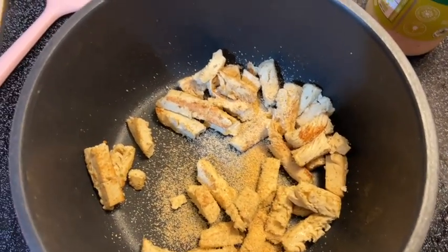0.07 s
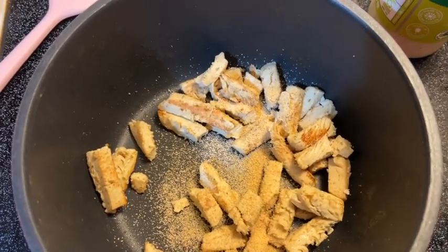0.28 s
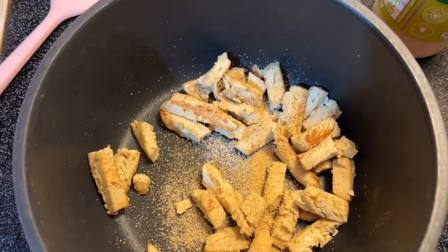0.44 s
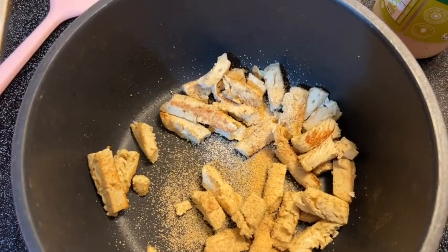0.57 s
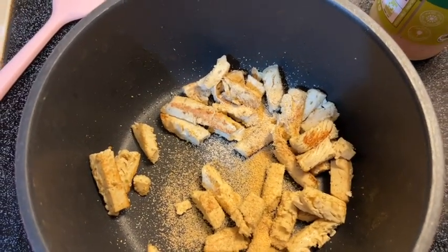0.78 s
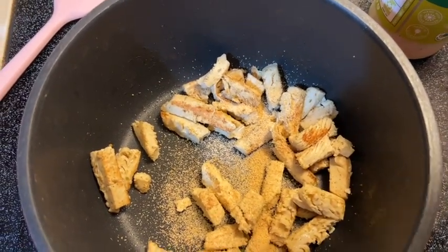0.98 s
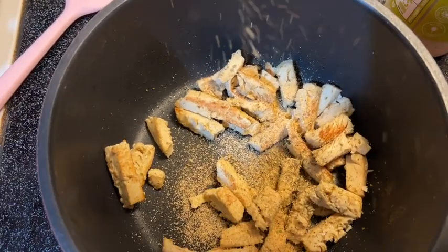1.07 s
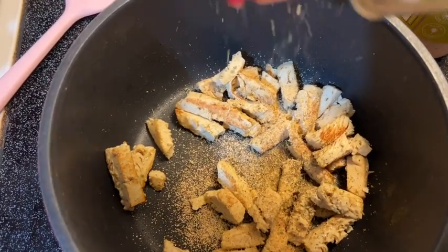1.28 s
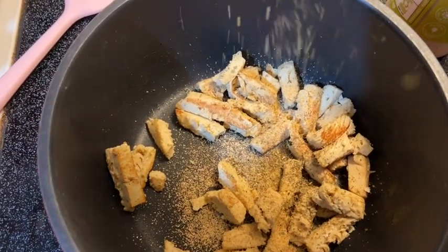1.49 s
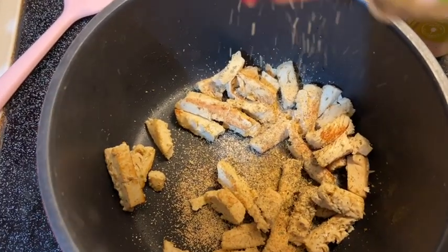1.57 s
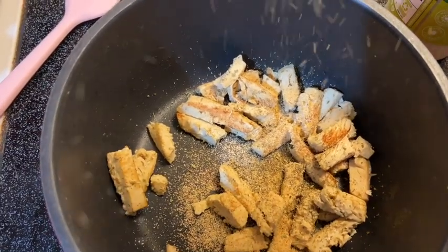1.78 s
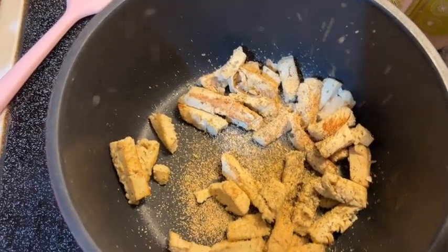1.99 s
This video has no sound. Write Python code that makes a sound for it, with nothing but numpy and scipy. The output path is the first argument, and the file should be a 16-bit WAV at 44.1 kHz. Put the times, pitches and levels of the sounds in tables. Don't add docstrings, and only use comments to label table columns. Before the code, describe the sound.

A spice jar thumps and rattles, its lid snaps, then dry grains pour hissing into a pan

```python
import sys
import numpy as np
from scipy import signal
from scipy.fft import rfft, irfft, next_fast_len
from scipy.io import wavfile
from scipy.ndimage import uniform_filter1d, map_coordinates

SR = 44100
rng = np.random.default_rng(int(sys.argv[2]) if len(sys.argv) > 2 else 0)


def to_linear_factor(level_db):
    exponent = np.asarray(level_db, float) / 20
    return 10 ** exponent


def output_pcm(signal):
    pcm = np.clip(np.atleast_2d(signal).T, -1, 1) * 32767
    wavfile.write(sys.argv[1], SR, np.round(pcm).astype(np.int16))


N = 90404

# [f/Hz, level/dB, t60/s]
JAR_MODES = [(127.2, -13, 0.09), (191, -13, 0.057), (259.8, 2, 0.086), (290.2, -5.5, .08),
             (350.3, -13.5, 0.13), (420.9, -5, 0.08), (560, -4.5, 0.046), (565, -9, 0.035),
             (663.2, -21, 0.11), (394.5, -1, 0.057), (483.8, -7.5, .04)]
# [f/Hz, width/Hz, level/dB]
CLATTER_BANDS = [(1250, 440, -6), (1470, 300, 4.5), (2050, 400, -3.5), (2990, 1300, -15), (5800, 830, -7)]
# [f/Hz, left minus right level/dB]
SLAM_SIDE = [(60, -12.5), (180, 7), (550, -4), (1650, -10), (4970, -10.5), (15000, 2.5)]
# [t/s, level/dB, f/Hz, t60/s]
THUDS = [(.201, -19.5, 385, 0.04), (0.243, -25, 332, 0.045), (0.263, -42, 294, 0.054),
         (.312, -39.5, 867, 0.034), (.317, -22.5, 264, 0.059), (.319, -29.5, 560, 0.055),
         (.341, -18, 309, 0.026), (.342, -28, 523, 0.033), (0.357, -36, 163, 0.057),
         (0.364, -28.5, 187.4, 0.072), (0.386, -44, 142, 0.1), (0.493, -43.5, 370, 0.06),
         (.546, -37.5, 560, 0.097), (0.555, -37.5, 458, 0.049), (.562, -29.5, 232, 0.047),
         (0.57, -45, 111, .1), (.674, -46.5, 654, 0.071), (.675, -49.5, 850, 0.036),
         (.686, -37.5, 224, 0.063), (0.7435, -26.5, 756, 0.023), (.744, -33.5, 546, 0.029),
         (1.129, -59, 330, 0.045), (1.46, -59, 621, 0.078), (1.2, -50, 313, 0.041), (1.2, -55, 745, .06),
         (1.99, -64.5, 489, 0.21), (2.04, -41.5, 760, 0.033), (2.046, -40.5, 1506, 0.027)]
# [t/s, level/dB, f/Hz, t60/s]
CAP_CLICKS = [(0.125, -37.5, 3400, 0.01), (0.125, -46, 6380, 0.016), (0.313, -42, 5630, 0.017),
              (0.312, -35, 1880, 0.013), (.324, -19, 4010, 0.0055), (.324, -38, 5800, 0.0086),
              (.324, -39, 10300, .008), (.324, -42, 14800, .008), (0.466, -44, 8180, 0.034),
              (.472, -33.5, 11100, 0.013), (.5545, -38.5, 1836, 0.015), (0.673, -51.5, 2210, 0.018),
              (.706, -44, 4000, .01), (1.107, -62, 526, 0.15), (1.463, -31, 3033, 0.008),
              (1.463, -39.5, 5900, .008)]
# [t/s, level/dB, f/Hz]
LARGE_GRAINS = [(.126, -47, 3500), (.3245, -30, 4000), (.3855, -31, 4500), (.408, -40, 5500),
                (.464, -41, 6500), (.473, -36, 4000), (.493, -34, 6500), (.4985, -35, 8500),
                (.518, -29, 12500), (.709, -40, 7500), (.8265, -41, 7000), (.976, -47, 11000),
                (1.007, -33, 6500), (1.0095, -33, 6500), (1.108, -36, 7500), (1.1345, -31, 6500),
                (1.173, -33, 12000), (1.191, -33, 11500), (1.196, -37, 8000), (1.204, -33, 5000),
                (1.2277, -23, 7000), (1.345, -31, 7000), (1.448, -25, 7500), (1.462, -29, 4000),
                (1.47, -36, 5000), (1.4995, -31, 7500), (1.5025, -34, 6000), (1.609, -32, 6500),
                (1.773, -30, 6500), (1.779, -33, 4000), (1.788, -33, 5000), (1.855, -30, 5500),
                (1.875, -32, 12000), (1.94, -36, 11000), (2.008, -35, 11000)]
# [t/s, level/dB, f/Hz, t60/s]
SCUFFS = [(.125, -55.5, 2000, 0.027), (.311, -47.5, 1640, 0.12), (.338, -51.5, 1480, .07),
          (.326, -52, 3600, 0.073), (.408, -47.5, 5320, .03), (.544, -57.5, 1720, 0.17),
          (.674, -57, 1510, 0.056), (1.41, -56, 1900, .05), (1.46, -50.5, 1900, 0.042),
          (1.78, -57.5, 1700, .04)]
# [t/s, length/s, level/dB, treble level/dB]
SHAKES = [
    (0.384, 0.02, -52.5, -2.5),
    (0.461, .02, -55, 0.5),
    (0.489, 0.037, -49, 2),
    (0.704, 0.062, -47.5, -0.5),
    (1.001, 0.02, -47.5, 5),
    (1.02, 0.036, -48, -9),
    (1.198, 0.05, -48, -16),
    (1.25, 0.052, -52, -8.5),
]
# [f/Hz, level/dB per Hz]
RATTLE_COLOUR = [(150, -27.5), (500, -4), (900, -6.5), (1200, -15.5), (1600, -4), (3500, -4.5),
                 (8000, -4.5), (16500, -13)]
# [t/s, level/dB]
POUR_LEVEL = [(0, -56.5), (.04, -63.5), (.2, -64), (.4, -60.5), (.55, -62.5), (0.699, -61), (.85, -63),
              (1.0, -63.5), (1.067, -56.5), (1.108, -40.5), (1.298, -44), (1.6, -43.5), (2.05, -44)]
# [f/Hz, level/dB per Hz]
HISS_COLOUR = [(1250, -56), (1900, -29.5), (2700, -17), (3400, -11.5), (4600, -15), (5800, -7.5),
               (10500, -3), (16500, -7.5)]
# [f/Hz, width/Hz, level/dB]
PAN_RING = [(7850, 130, 6), (3400, 500, -3), (5320, 300, -2.5)]
# [t/s, level/dB]
HUM_LEVEL = [(0, -100), (.12, -78), (.6, -74.5), (.8, -82), (.97, -76), (1.2, -78), (1.319, -71.5),
             (1.43, -76.5), (1.5, -66), (1.58, -67.5), (1.69, -85), (1.8, -70.5), (2.05, -75.5)]
# [f/Hz, level/dB per Hz]
RUMBLE_COLOUR = [(20, 0.5), (60, -2.5), (110, -8), (300, -12), (800, -15), (1100, -35), (1500, -12.5),
                 (3000, -92)]
# [t/s, level/dB]
RUMBLE_LEVEL = [(0, -14.5), (.2, 4), (.5, -1), (.8, -11.5), (1.0, -4), (1.3, 1), (1.6, 0.5), (1.8, -1),
                (2.05, 4)]
# [f/Hz, t60/s]
KITCHEN_T60 = [(100, 0.32), (1000, 0.33), (4000, .22), (12000, .12)]
# [f/Hz, gap/rad]
PORT_GAP = [(4100, .02), (4500, 1.3), (5500, 1.2), (5900, .02), (7600, .04), (8100, 1.0), (11600, 2.0),
            (12400, np.pi)]
# [t/s, length/s]
SHARED_TREBLE = [(.2, .015), (.31, .03), (.46, .02), (.487, .045), (.70, .025), (.998, .035), (1.07, .035)]

SLAM_S, SLAM_DB, RING_LEAD_S, RING_RISE_S = .2085, -4.5, .001, .0035
THUMP_DB, THUMP_HZ, THUMP_T60_S = -18, 330, .06
CRACK_DB, CRACK_T60_S, CRACK_TOP_HZ = -10.5, .017, 5500
CLATTER_DB, CLATTER_T60_S = -12, .13
LID_S, LID_DB, LID_T60_S, LID_HZ, LID_WIDTH_HZ = .7424, -7, .0065, 3200, 7500
LID_TAIL_DB, LID_TAIL_T60_S = -24.5, .046
CLICK_RISE_S, CAP_PAIR_RATIO = .0012, 1.06
SNAP_TRIM_DB, SNAP_WIDTH, SNAP_FLOOR_HZ = 12.5, 1.2, 2600
REBOUND_S, REBOUND_DB = .0009, -4
SCUFF_WIDTH = .6
SHAKE_ATTACK_S, SHAKE_RELEASE_S, SHAKE_SAG_DB_PER_S, SHAKE_SPLIT_HZ = .0035, .009, 30, 6500
GRAINS_PER_S, GRAIN_DB, RATTLE_GRAIN_DB = 900, -12, -8
GRAIN_SPREAD_DB, GRAIN_CAP = 4.5, 2.6
PATCH_DB = 2.5
SIMMER_DB, SIMMER_HZ, SIMMER_WIDTH_HZ = -78, 2370, 1400
HUM_HZ, RUMBLE_DB = 156, -72.5
ROOM_DB, LOW_WIDTH_DB = -16, 3
DUCK_S, DUCK_LENGTH_S, DUCK_DB = 1.068, .055, -29
LEAK_DB, LEAK_HZ, SPREAD_DB, SPREAD_HZ, SPREAD_WIDTH_HZ = -17, 12300, -7.5, 9500, 3000
NOTCH_HZ, NOTCH_WIDTH_HZ, NOTCH_DEPTH = 1220, 230, .46
LOW_CUT_HZ, TOP_HZ = 92, 16000


def unit(x):
    return x / np.sqrt(np.mean(x ** 2) + 1e-20)


def along(points, hz):
    f, v = np.transpose(points)
    return np.interp(np.log(hz + 1), np.log(f + 1), v)


def over_time(points):
    s, level_db = np.transpose(points)
    return np.interp(np.arange(N) / SR, s, level_db)


def wobble(rate):
    knots = rng.standard_normal(int(N * rate / SR) + 4)
    return map_coordinates(knots, [np.arange(N) * rate / SR])


def filtered(x, response):
    m = next_fast_len(N + SR // 2)
    return irfft(rfft(x, m) * response(np.fft.rfftfreq(m, 1 / SR)), m)[..., :N]


def peak(f, hz, width_hz):
    return 1j * f * width_hz / (hz * hz - f * f + 1j * f * width_hz)


def add(out, s, sound):
    part = out[round(s * SR):][:len(sound)]
    part += sound[:len(part)]


def rough(hz, width, t60):
    t = np.arange(SR // 4) / SR
    response = peak(np.fft.rfftfreq(len(t), 1 / SR), hz, width * hz) ** 2
    noise = irfft(rfft(rng.standard_normal(len(t))) * response, len(t))
    return unit(noise) * to_linear_factor(-60 * t / t60) * (1 - np.exp(-t / CLICK_RISE_S))


def gritty(colour, grain_db):
    size_db = GRAIN_SPREAD_DB * np.minimum(rng.exponential(size=N), GRAIN_CAP)
    struck = rng.random(N) < GRAINS_PER_S / SR
    hits = struck * to_linear_factor(size_db) * np.sign(rng.standard_normal(N))
    return unit(filtered(rng.standard_normal(N) + to_linear_factor(grain_db) * unit(hits), colour))


def patchy(x):
    z = signal.stft(x, nperseg=512)[2]
    field = uniform_filter1d(rng.standard_normal(z.shape), size=5, axis=0)
    field = uniform_filter1d(field, size=8, axis=1)
    return unit(signal.istft(z * to_linear_factor(PATCH_DB * unit(field)), nperseg=512)[1][:N])


def slam():
    out, burst, t = np.zeros(N), np.zeros(N), np.arange(SR // 4) / SR
    ring = sum(to_linear_factor(db - 60 * t / t60) * np.sin(2 * np.pi * hz * t) for hz, db, t60 in JAR_MODES)
    ring = ring * (1 - np.exp(-t / RING_RISE_S)) ** 2
    thump = to_linear_factor(THUMP_DB) * rough(THUMP_HZ, 1.3, THUMP_T60_S)
    add(out, SLAM_S - RING_LEAD_S, to_linear_factor(SLAM_DB) * ring + thump)

    decay = to_linear_factor(-60 * t / CRACK_T60_S) + to_linear_factor(CLATTER_DB - 60 * t / CLATTER_T60_S)
    add(burst, SLAM_S, to_linear_factor(CRACK_DB) * decay * rng.standard_normal(len(t)))

    def clatter(f):
        bands = sum(to_linear_factor(db) * peak(f, hz, width) for hz, width, db in CLATTER_BANDS)
        return bands / (1 + 1j * f / CRACK_TOP_HZ) ** 2

    return out + filtered(burst, clatter)


def knocks():
    out, t = np.zeros(N), np.arange(SR // 4) / SR
    for (s, db, hz, t60), spread in zip(THUDS, rng.uniform(-1.1, 1, (len(THUDS), 4))):
        ratios = np.array([.62, .84, 1.13, 1.27]) + 0.059 * spread
        neighbours = np.sin(2 * np.pi * hz * ratios[:, None] * t).sum(axis=0)
        cluster = np.sin(2 * np.pi * hz * t) + .45 * neighbours
        rise = (1 - np.exp(-t * hz / 0.65)) ** 2
        add(out, s, to_linear_factor(db - 60 * t / t60) * rise * cluster)
    return out


def lid():
    burst, t = np.zeros(N), np.arange(SR // 8) / SR
    decay = to_linear_factor(-60 * t / LID_T60_S) + to_linear_factor(LID_TAIL_DB - 60 * t / LID_TAIL_T60_S)
    shape = (1 - np.exp(-t / 0.00055)) * decay
    add(burst, LID_S, to_linear_factor(LID_DB) * shape * np.sign(rng.standard_normal(len(t))))
    return filtered(burst, lambda f: peak(f, LID_HZ, LID_WIDTH_HZ))


def caps():
    out, t = np.zeros(N), np.arange(SR // 8) / SR
    rise = (1 - np.exp(-t / CLICK_RISE_S)) ** 2
    for s, db, hz, t60 in CAP_CLICKS:
        pair = np.sin(2 * np.pi * hz * t) + .5 * np.sin(2 * np.pi * CAP_PAIR_RATIO * hz * t)
        add(out, s, to_linear_factor(db - 60 * t / t60) * rise * 2 * pair)
    return out


def large_grains():
    out, f = np.zeros(N), np.fft.rfftfreq(512, 1 / SR)
    for (s, db, hz), (late, turn) in zip(LARGE_GRAINS, rng.random((len(LARGE_GRAINS), 2))):
        snap = to_linear_factor(db + SNAP_TRIM_DB) * irfft(peak(f, hz, SNAP_WIDTH * hz))
        add(out, s, snap * np.sign(turn - .5))
        add(out, s + REBOUND_S * (.5 + late), to_linear_factor(REBOUND_DB) * snap)
    return filtered(out, lambda f: (1j * f / (SNAP_FLOOR_HZ + 1j * f)) ** 2)


def scuffs():
    out = np.zeros(N)
    for s, db, hz, t60 in SCUFFS:
        add(out, s, to_linear_factor(db) * rough(hz, SCUFF_WIDTH, t60))
    return out


def shakes():
    t, shapes = np.arange(N) / SR, []
    for s, length, db, _ in SHAKES:
        rise = np.clip((t - s) / SHAKE_ATTACK_S, 0, 1)
        release = np.exp(-np.clip(t - s - length, 0, 1) / SHAKE_RELEASE_S)
        shapes.append(to_linear_factor(db - SHAKE_SAG_DB_PER_S * np.clip(t - s, 0, 1)) * rise * release)
    shapes = np.array(shapes)
    grains = to_linear_factor(1.1 * wobble(120)) * gritty(lambda f: to_linear_factor(along(RATTLE_COLOUR, f)), RATTLE_GRAIN_DB)
    body = filtered(grains, lambda f: 1 / (1 + (f / SHAKE_SPLIT_HZ) ** 4))
    treble_gain = to_linear_factor([row[-1] for row in SHAKES])
    return shapes.sum(axis=0) * body + treble_gain @ shapes * (grains - body)


def sizzle():
    def colour(f):
        ring = sum(to_linear_factor(db) * peak(f, hz, width) for hz, width, db in PAN_RING)
        return to_linear_factor(along(HISS_COLOUR, f)) * (1 + ring)

    level_db = over_time(POUR_LEVEL) + .7 * wobble(12) + 0.76 * wobble(60)
    return to_linear_factor(level_db) * patchy(gritty(colour, GRAIN_DB))


def simmer():
    noise = rng.standard_normal(N)
    hiss = filtered(noise, lambda f: peak(f, SIMMER_HZ, SIMMER_WIDTH_HZ) ** 2)
    return to_linear_factor(SIMMER_DB) * patchy(patchy(hiss))


def fan():
    phase = 2 * np.pi * HUM_HZ * np.arange(N) / SR + .7 * wobble(18)
    hum = unit(to_linear_factor(1.4 * wobble(29)) * np.sin(phase))
    air = unit(filtered(rng.standard_normal((2, N)), lambda f: to_linear_factor(along(RUMBLE_COLOUR, f))))
    air_db = RUMBLE_DB + over_time(RUMBLE_LEVEL) + 2.5 * wobble(7.2)
    return to_linear_factor(over_time(HUM_LEVEL)) * hum + to_linear_factor(air_db) * (air + .6 * air[::-1])


def kitchen(x):
    hz, t, z = signal.stft(rng.standard_normal((2, SR // 3)), SR, nperseg=256)
    decay = to_linear_factor(-60 * t / along(KITCHEN_T60, hz)[:, None])
    tail = signal.istft(z * decay, SR, nperseg=256)[1]
    tail = tail / np.linalg.norm(tail, axis=1, keepdims=True)
    tail = tail * [[1], [to_linear_factor(LOW_WIDTH_DB)]]
    late = np.pad(x, (150, 0))
    mid, side = signal.fftconvolve(late[None], tail, axes=1)[:, :N]
    low_side = filtered(side, lambda f: 1 / (1 + 1j * f / 1000) ** 2)
    return ports(mid) + low_side * [[1], [-1]]


def ports(x):
    return filtered(x, lambda f: np.exp(.5j * along(PORT_GAP, f) * np.array([[1], [-1]])))


def scene():
    blow, jar = slam(), knocks()
    small = caps() + large_grains() + lid() + shakes() + scuffs()
    pan = sizzle()
    lean = lambda f: to_linear_factor(along(SLAM_SIDE, f) / 2 * np.array([[1], [-1]]))
    near = filtered(ports(blow), lean) + ports(jar) * to_linear_factor([[.9], [-.9]])

    t = np.arange(N) / SR
    after = t - DUCK_S
    duck = to_linear_factor(DUCK_DB * (after > 0) * np.exp(-(after / DUCK_LENGTH_S) ** 2))

    shared = sum((t > s) * (t < s + length) for s, length in SHARED_TREBLE)
    shared = uniform_filter1d(1. * shared, size=300)
    leak = to_linear_factor(LEAK_DB) * filtered(shared * (small + blow + pan), lambda f: f > LEAK_HZ)

    difference = filtered(sizzle(), lambda f: peak(f, SPREAD_HZ, SPREAD_WIDTH_HZ) ** 2)
    spread = to_linear_factor(SPREAD_DB) * difference * [[1], [-1]]

    background = to_linear_factor(ROOM_DB) * kitchen(blow + jar + small) + fan()
    return near + ports(small + pan + duck * simmer()) + leak + spread + duck * background


def top_cut(x):
    return signal.sosfilt(signal.butter(12, 16730, fs=SR, output="sos"), x)


def record(dry):
    def microphone(f):
        low_cut = (1j * f / (LOW_CUT_HZ + 1j * f)) ** 2
        housing = 1 - NOTCH_DEPTH * peak(f, NOTCH_HZ, NOTCH_WIDTH_HZ)
        return (f < TOP_HZ) * housing * low_cut

    return top_cut(filtered(dry, microphone))


dry = scene()
out = record(dry)
output_pcm(out)
```